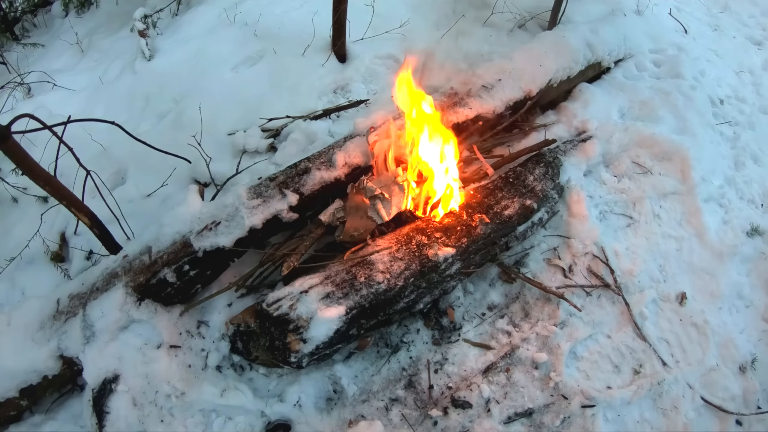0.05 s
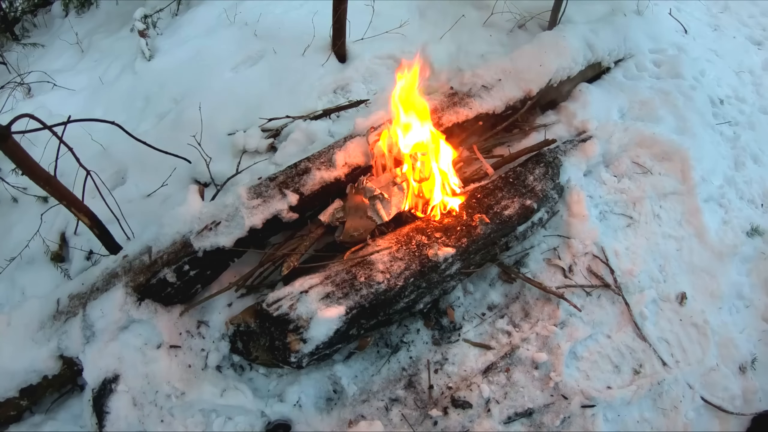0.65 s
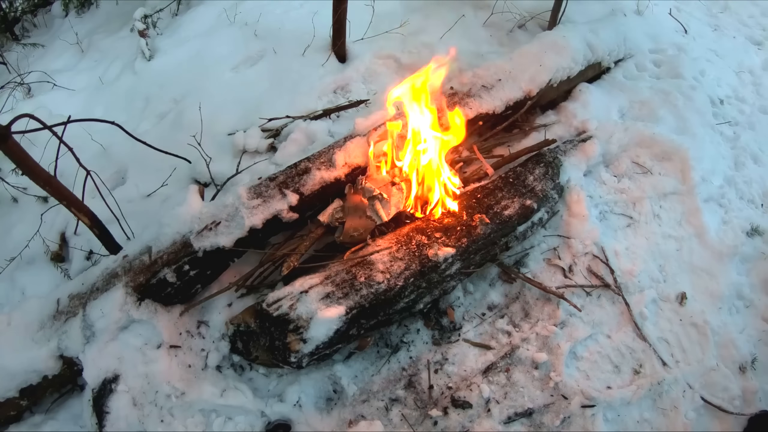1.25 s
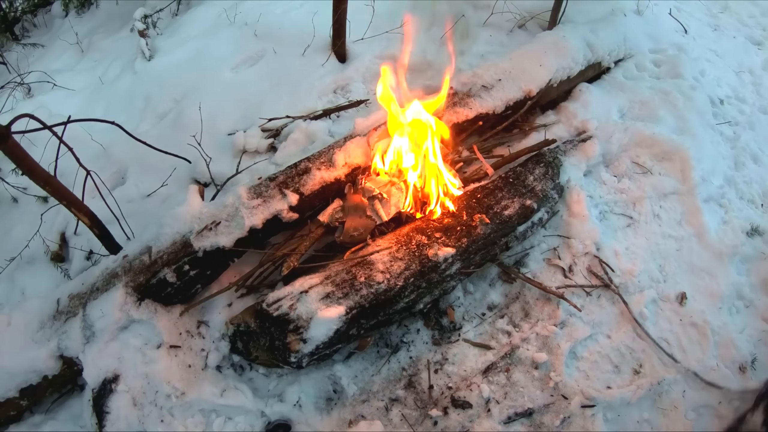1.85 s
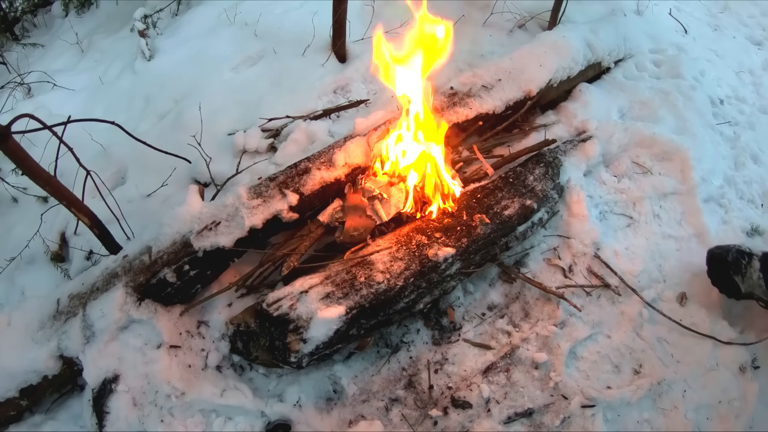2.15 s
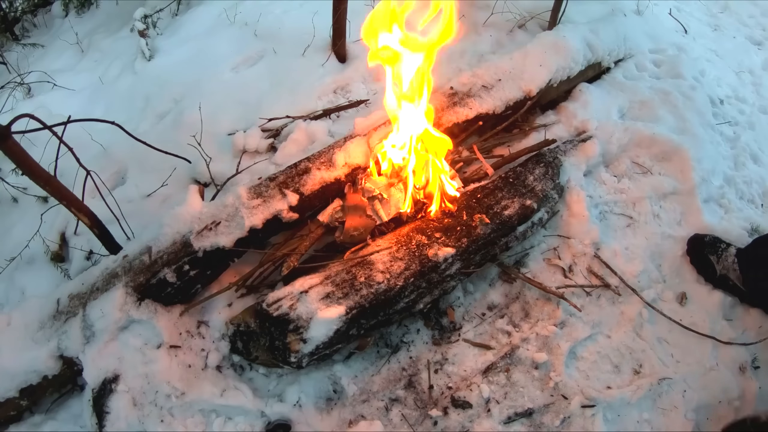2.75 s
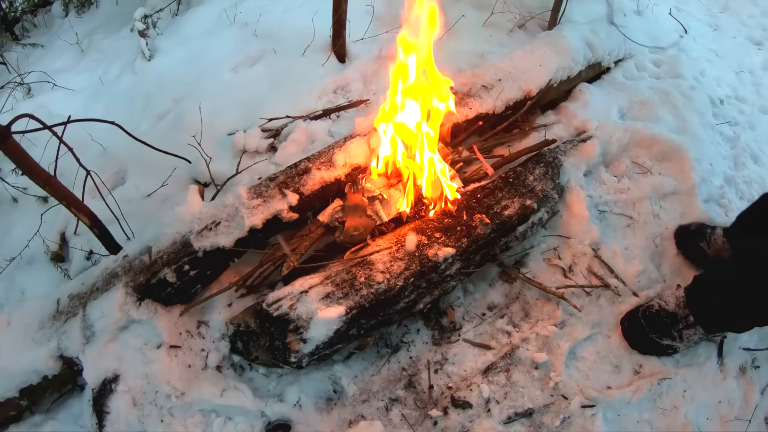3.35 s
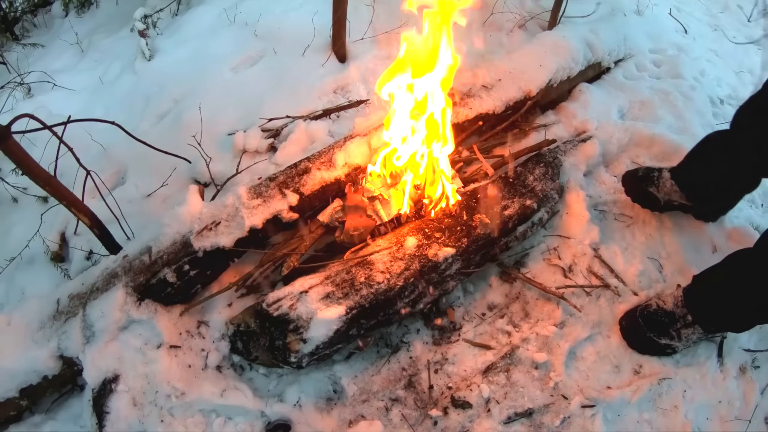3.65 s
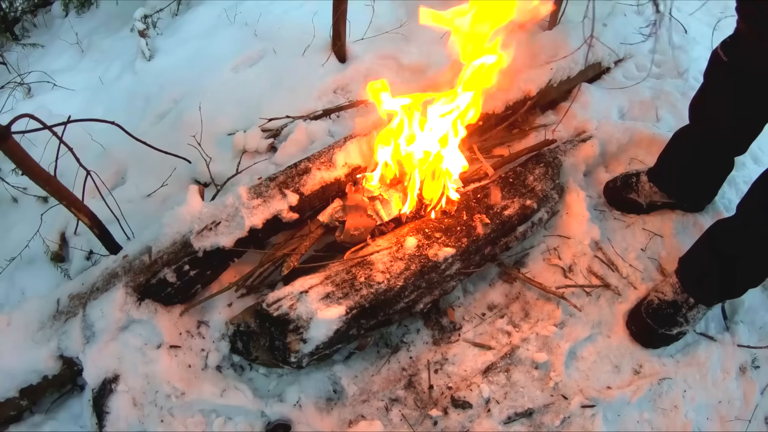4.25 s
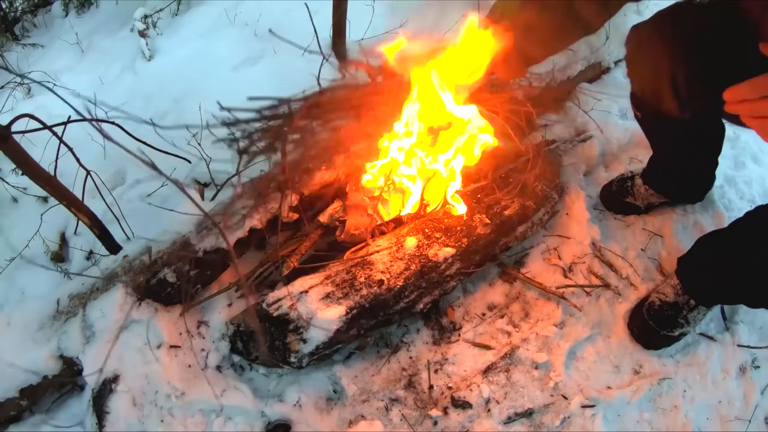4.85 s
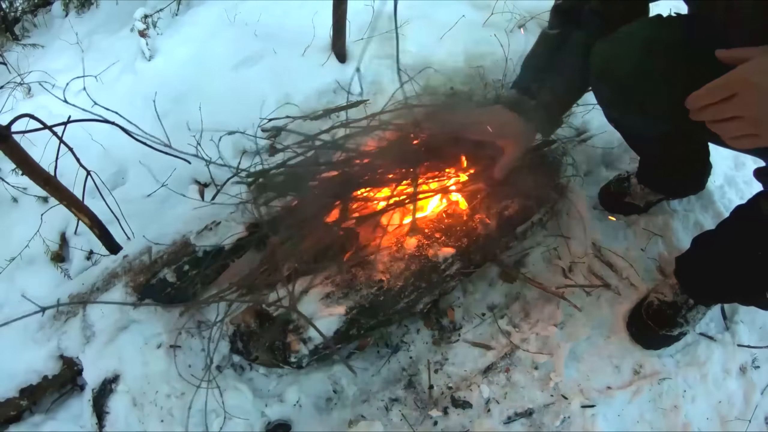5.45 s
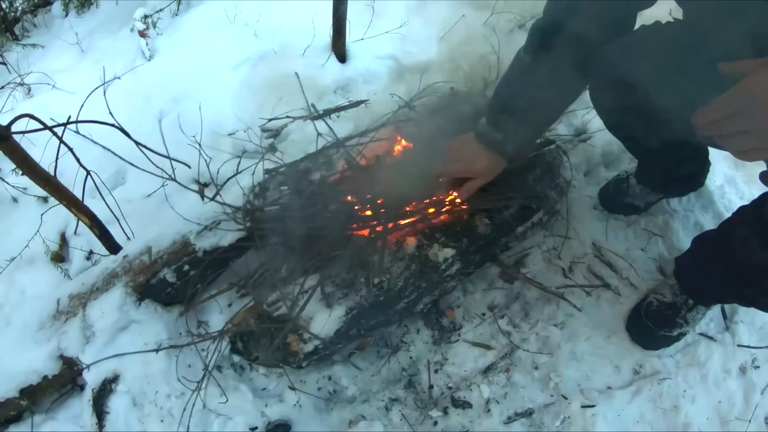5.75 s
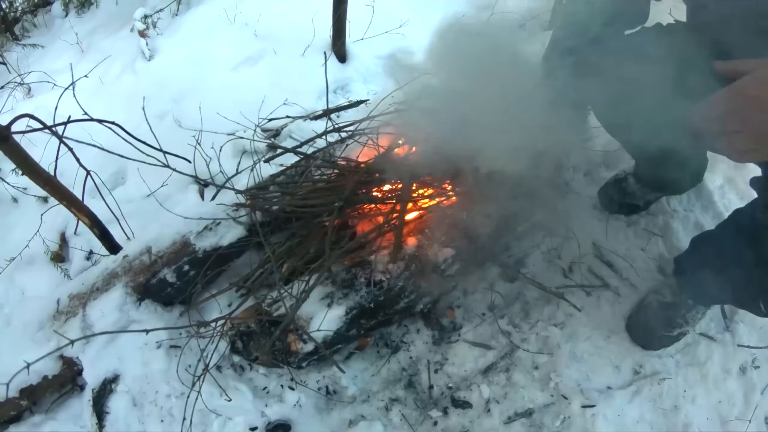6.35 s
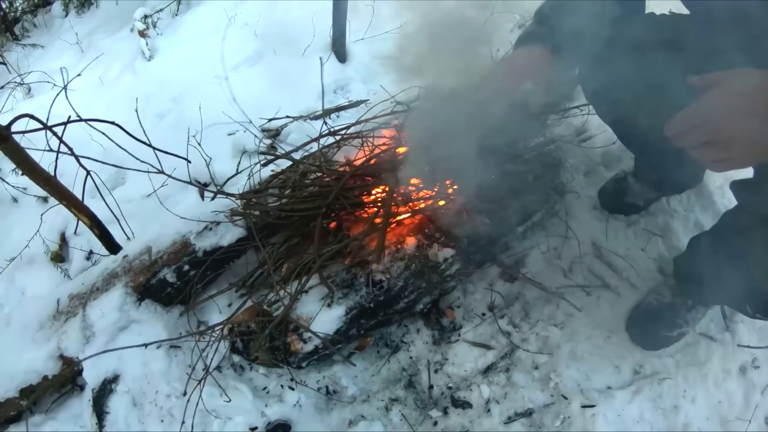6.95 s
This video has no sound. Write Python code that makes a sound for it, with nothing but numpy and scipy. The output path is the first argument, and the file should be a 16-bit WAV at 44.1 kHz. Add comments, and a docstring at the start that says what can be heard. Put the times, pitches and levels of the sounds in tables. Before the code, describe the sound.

A small campfire of damp wood hisses and pops close to the microphone in a snowy forest, with a low flutter of flames underneath. Footsteps crunch through the snow on the right, and a branch cracks underfoot. Then an armful of brushwood is pressed onto the fire, knocking and rustling, and a dry stick snaps. The fire ends quieter, half smothered. There is almost no echo.

```python
"""A small campfire of damp bark and kindling burns in a snowy forest, close to a stereo microphone:
steam hisses from the wood, pockets burst in pops and the flames flutter low. From about 1 s someone
crunches through the snow on the right, cracking a branch underfoot at 2.2 s. From about 4 s they press
an armful of brushwood onto the flames; it knocks and rustles, and a dry stick snaps at 5.7 s.
The fire ends half smothered."""
import sys
import numpy as np
from scipy import signal
from scipy.fft import rfft, irfft
from scipy.io import wavfile
from scipy.ndimage import uniform_filter1d

SR = 44100
rng = np.random.default_rng(int(sys.argv[2]) if len(sys.argv) > 2 else 0)


def transcribe(u):
    """Save the signal u as a 16-bit wav file named by the first command-line argument.

    u: samples, shape (n,) or (channels, n), limited to [-1, 1]; the rate is SR.
    q: integer samples, one column per channel.
    """
    v = np.clip(np.atleast_2d(u).T, -1, 1)
    q = np.round(v * 32767).astype(np.int16)
    wavfile.write(sys.argv[1], SR, q)


N = 317520

# the louder pops of fire and twigs: (time [s], relative level [dB], centre [Hz], left over right [dB])
POPS = [(0.1861,-33,3700,-1), (0.3154,-30.5,3700,-2), (0.4111,-28.5,4530,-1), (0.4866,-34,3490,-1),
        (.571,-37,3400,3), (.661,-29,3500,-1), (0.6835,-24,4220,0.5), (0.806,-28,4790,-20),
        (0.869,-32,5140,-11), (0.9587,-31,4230,0), (1.0577,-36.5,1980,-8), (1.181,-34,4520,13),
        (1.2059,-27,3800,-1), (1.3178,-28,3700,-1), (1.3464,-24.5,4400,1), (1.379,-33,4670,-17),
        (1.751,-31,4160,-1), (1.873,-28.5,3480,-1), (1.961,-25.5,3920,0.5), (2.0228,-18.5,3550,-0.5),
        (2.0685,-27.5,3950,-8), (2.1545,-21,5030,-10), (2.3188,-24.5,6000,0), (2.428,-27.5,3050,-25),
        (2.478,-24.5,1500,-29), (2.8763,-34,3310,-12), (2.984,-36,3500,-9), (3.068,-28.5,3350,-7),
        (3.303,-30.5,3820,-17), (3.626,-27,4400,-7), (3.8104,-31.5,3860,-10), (3.8478,-30.5,2820,-9),
        (3.8797,-26.5,4420,-4), (3.9352,-33,3040,-3), (4.0027,-28,4200,-2), (4.025,-28.5,2200,-17),
        (4.0733,-28,4370,4), (4.111,-32,4900,0), (4.1462,-34.5,4300,0), (4.3535,-34,2920,-1),
        (4.893,-40,4900,2), (4.919,-38,3800,0), (5.0047,-37,4060,0), (5.1058,-29,4230,3),
        (5.1706,-28,4630,6), (5.5187,-28,4300,-2), (5.576,-39.5,3320,0), (5.7802,-31.5,3660,-1),
        (5.903,-37,3500,-2), (5.936,-34,5500,1), (6.106,-36,3450,3), (6.289,-39,3900,0), (6.34,-44,1300,-4),
        (6.386,-46,5800,10), (6.965,-38,3140,0), (6.994,-36.5,3500,1)]
# steam from the wood, choked once the brushwood lies on it: (time [s], relative level [dB])
STEAM_CURVE = [(0,-40.5), (.2,-50.5), (.8,-43.5), (1.13,-45.5), (1.35,-38), (1.78,-43.5), (2.05,-40.5),
               (3.2,-38), (3.55,-35.5), (3.75,-40.5), (4.25,-38), (4.5,-40.5), (4.93,-40.5), (5.13,-40),
               (5.35,-46.5), (6.1,-43.5), (6.35,-54), (6.6,-55.5), (7.2,-46.5)]
# pockets of sap boil off: (time [s], half-width [s], lift of high jets [dB], lift of low jets [dB])
SAP_SURGES = [(0.032,0.015,-2,9.5), (0.112,0.028,4,10), (0.23,0.025,7,6), (0.343,0.093,7,13),
              (0.512,0.026,3,11), (0.717,0.097,4.5,9), (0.99,0.061,5.5,7), (2.14,0.077,8,8),
              (2.464,0.017,8,5), (2.64,0.016,5,6.5), (2.786,0.0082,10.5,5), (3.08,0.049,1.5,3.5),
              (3.82,0.018,3.5,6.5), (4.016,0.018,2,9)]
# steam puffs and twig scrapes: (time [s], level [dB], half-width [s], centre [Hz], left over right [dB])
SPURTS = [(.345,-40,0.033,3700,0), (.762,-21,0.0049,7450,-18), (1.348,-29,0.0045,4160,-3),
          (2.121,-39,.02,4150,-15), (2.154,-22.5,0.0027,4700,-4), (2.297,-30,0.003,3970,-3),
          (4.808,-27.5,0.0064,4770,3), (5.7,-24.5,0.0067,3860,-1), (5.904,-10,0.0014,5500,-0.5),
          (5.934,-24.5,0.012,6160,1), (6.769,-31,0.0065,4050,1)]
# sap sings in a narrow crack: (time [s], level [dB], half-width [s], pitch [Hz])
WHISTLES = [(0.05,-40,0.0066,2960), (0.361,-43,0.031,3220), (0.521,-36,0.007,6060), (0.53,-41,0.0073,3150),
            (0.609,-38.5,0.021,5760), (2.878,-33,0.006,3300)]
# tone of the fire's pops, bark ticks, steam jets and flames: (frequency [Hz], gain [dB])
SNAP_EQ = [(100, -29.5), (500, 1.5), (1000, 7.5), (2000, -3), (2900, 1.5), (4500, -6), (5900, 5.5),
           (7000, 1), (10000, -2.5)]
TICK_EQ = [(300, -28.5), (800, -6), (1500, -3.5), (2900, -10), (4600, -12.5), (5800, 7), (9000, -1.5)]
HIGH_JET_EQ = [(1000, -23), (3000, -21), (4500, -12), (5300, 0), (5800, -3.5), (6600, 3), (9000, -4)]
LOW_JET_EQ = [(300, -27.5), (800, -4), (1500, -6.5), (2300, -3.5), (2900, 2.5), (3700, -1), (4600, -4),
              (6000, -2), (9000, -19)]
FLAME_EQ = [(15,-13), (30,-13.5), (50,-4.5), (80,2), (130,0.5), (185,-8), (250,-17), (500,-46), (2000,-53)]
# the flames swell, then sink: (time [s], level [dB])
FLAME_CURVE = [(0,-44.5), (1,-42), (1.7,-38), (2.1,-40), (2.6,-42), (3.5,-38.5), (4.2,-46), (5,-48),
               (5.7,-51.5), (6.4,-54.5), (7.2,-60)]

# weight comes down on snow or brushwood, in relative levels:
# (time of full weight [s], build-up [s], crunch [dB], deep thud [dB], hollow groan [dB])
LOADS = [(1.09,0.015,-44,-35,-42), (1.38,0.17,-47,-34,-40.5), (1.921,0.035,-30,-31,-33.5),
         (2.25,0.18,-31,-30,-34), (2.50,0.2,-36.5,-30.5,-34.5), (2.72,0.4,-34,-34.5,-35.5),
         (2.90,1,-39,-60,-55), (3.409,0.063,-36,-26,-40), (3.64,0.26,-44,-39,-45),
         (4.10,0.26,-36.5,-43.5,-56), (4.28,0.0082,-35,-57.5,-60), (4.68,0.024,-43,-31,-42),
         (4.80,0.11,-42,-33.5,-49), (5.14,0.088,-40,-33.5,-34.5), (5.93,0.0098,-25.5,-28,-46),
         (6.069,0.028,-29.5,-32.5,-35.5), (6.78,0.19,-62,-49,-59)]
# faint settling of the embers, in relative levels: (crunch [dB], thud [dB], groan [dB])
EMBERS_DB = [-45, -46.5, -57.5]
# dull knocks of boots in packed snow and of shifted wood:
# (time [s], relative thud level [dB], pitch [Hz], thud decay [s], crunch level [dB], crunch decay [s])
KNOCKS = [(0.858,-32.5,280,.006,-51,0.004), (1.057,-33,202,0.0051,-35.5,0.0021),
          (1.073,-23,186,0.01,-33.5,0.006), (1.153,-30,177,0.0057,-35,0.0062),
          (1.241,-48,228,.006,-34.5,0.01), (1.292,-30.5,217,0.0065,-40,0.0014),
          (1.348,-26,191,0.0086,-36,0.0086), (1.377,-28,188,0.0086,-39,0.0033),
          (1.411,-27,220,0.0061,-36.5,.0023), (1.455,-34,252,.005,-29,0.0043),
          (1.467,-24,185,.006,-37,0.0021), (1.927,-40,195,0.0087,-28.5,0.0053),
          (2.24,-20.5,179,0.018,-35,0.0017), (2.318,-14.5,283,0.005,-21.5,0.003),
          (2.385,-28.5,294,0.0046,-49,0.0022), (2.428,-29,300,0.0076,-37,0.0035),
          (2.476,-28.5,340,0.0065,-29,0.013), (2.62,-34,298,.006,-28,0.0029),
          (2.686,-25.5,317,0.01,-33,.0042), (2.835,-24,322,0.0029,-39,0.0042),
          (2.756,-37,300,0.0055,-32,0.0028), (2.891,-36,282,0.0063,-27.5,0.019),
          (2.921,-31.5,286,0.0074,-32.5,0.0073), (3.327,-34,240,0.0045,-35,.003),
          (3.363,-36,220,0.0046,-31.5,0.0069), (3.38,-21.5,203,0.0053,-30.5,0.011),
          (3.418,-23,181,.006,-31.5,0.006), (3.429,-21,194,0.0067,-35,.005),
          (3.643,-21.5,245,0.0054,-24,0.0045), (4.095,-36,280,0.0082,-28.5,0.016),
          (4.416,-36,362,0.004,-52,0.0052), (4.465,-35,370,.005,-39,0.0026),
          (4.648,-29.5,330,0.0044,-39,0.0044), (4.688,-25,295,0.004,-36.5,0.0048),
          (4.775,-31,383,0.007,-32,0.017), (4.85,-32,271,0.0074,-30,0.014),
          (4.973,-35.5,222,.006,-39.5,.005), (5.062,-31,297,0.0053,-34.5,0.0045),
          (5.096,-24,235,0.005,-34,0.003), (5.134,-22,320,0.006,-26,0.0063),
          (5.147,-25,333,0.0054,-31.5,0.0056), (5.167,-28,200,0.0069,-33,0.0094),
          (5.193,-21.5,210,0.0032,-28,0.0036), (5.914,-31.5,403,0.0075,-31,.004),
          (5.93,-29.5,209,0.0095,-41,0.0044), (6.035,-25,370,0.0046,-29,0.0061),
          (6.063,-32,249,0.0045,-32,0.0029), (6.105,-34,251,0.0022,-48,0.0027)]
# a branch cracks under a boot: (time [s], level [dB], left over right [dB])
BRANCH_CRACKS = [(2.2419,-12,-16), (2.3201,-18,-16)]
# sticks knock together, underfoot or in the armful: (time [s], level [dB], pitch [Hz], rasp decay [s])
CLACKS = [(2.3205,-33,570,.002), (4.092,-30,627,0.0053), (4.4182,-24.5,614,0.00088),
          (4.4641,-24,614,0.0015), (4.510,-27,780,0.01), (4.777,-20,674,0.0037), (4.853,-27,880,0.0046),
          (5.137,-26.5,550,.0006), (5.1955,-23.5,846,0.00086), (5.842,-27.5,520,0.0034),
          (7.016,-38.5,900,.002)]
# dry twigs brush past each other with each push: (time [s], half-width [s], level [dB])
RUSTLES = [(4.801,0.038,-30.5), (5.082,0.051,-34), (5.49,0.032,-39.5), (5.7,0.039,-33.5), (5.805,0.025,-36),
           (5.946,0.031,-31), (6.122,0.076,-43), (6.327,0.087,-47), (6.525,0.044,-44), (6.735,0.077,-37.5),
           (6.93,0.039,-40), (7.086,0.063,-41.5)]
# a dry stick breaks: (time [s], level [dB])
STICK_BREAK = (5.7075, -15)
# the ring of its halves: (frequency [Hz], relative level [dB], decay [s])
STICK_MODES = [(1980, 3, 0.0025), (2200, 12.5, 0.0014), (2480, 10, 0.002), (2730, 3, 0.0053),
               (3200, -4, .001), (3550, 1.5, 0.0035)]
# tone of crunch, ground thud, snow-muffled grit, branch and twigs: (frequency [Hz], gain [dB])
CRUNCH_EQ = [(150, -40.5), (350, -19), (700, 0), (1200, 3.5), (1800, 2), (3000, -2), (6000, -10),
             (9000, -36.5)]
THUD_EQ = [(25, -41), (60, -18), (130, -3.5), (185, -1.5), (240, 0.5), (310, -13), (420, -9.5), (700, -16),
           (2000, -71)]
MUFFLED_EQ = [(120, -22), (350, -2), (550, 5.5), (1100, -2), (1700, -4.5), (2600, -5), (6000, -4)]
BRANCH_EQ = [(200,-16), (650,-6), (1030,3.5), (1350,-8), (1700,0.5), (2200,-4), (2800,-2.5), (3700,-17),
             (5000,-19), (6000,-14), (7000,-13.5), (9500,-13)]
RUSTLE_EQ = [(300,-3.5), (520,-8.5), (760,-0.5), (1050,-8.5), (1700,-6.5), (2300,-5), (3400,-1.5),
             (4600,-7), (6200,-4.5), (9000,-15.5)]
# treble loss of the microphone: (frequency [Hz], gain [dB])
MICROPHONE_EQ = [(20, -1.5), (6600, 1), (7100, -4), (7800, -13.5), (9200, -15.5), (9900, -29), (10500, -53),
                 (15000, -59)]


def pop(db, hz, pan_db, ring_db=-9):
    """Fibres tear and a pocket bursts; each splinter rings very briefly at its own pitch."""
    stretch = 1.5 + .05 * max(db + 26, 0)  # big pops tear for longer
    lead, burst = tearing(.0005 * stretch, .0007 * stretch, alike=0.93)
    ring_hz = hz * 0.9 * np.exp(0.17 * rng.standard_normal())
    ring = unit_rms(resonance(burst, ring_hz, q=9))
    body = unit_rms(resonance(burst, hz, q=1.13))
    snap = eq(body + gain_of(ring_db) * ring, SNAP_EQ)
    return lead, with_energy(snap, db + 1, held_s=.006) * pan(pan_db)


def small_pops(count=8):
    """Faint pops at random moments, louder where the steam runs stronger."""
    out, steam_db = np.zeros((2, N)), follow(STEAM_CURVE)
    moments = rng.integers(0, N, count)
    for at, (size, pitch, side) in zip(moments, rng.standard_normal((count, 3))):
        lead, sound = pop(steam_db[at] + 2 + 3.5 * size, hz=3900 * np.exp(.2 * pitch), pan_db=5 * side)
        add(out, at / SR + lead, sound)
    return out


def steam(high_db=-2, low_db=-3, tick_db=-8):
    """High and low jets and ticking bark ride one wavering pressure, surging as sap boils off."""
    pressure_db = follow(STEAM_CURVE) + 0.96 * wander(9)
    surge_db = sum(np.outer(lift_db, swell(s, width)) for s, width, *lift_db in SAP_SURGES)
    high_flow, low_flow = gain_of(pressure_db + surge_db)
    high = gain_of(high_db) * jet(HIGH_JET_EQ, whistle_hz=5880, whistle_db=-6, fuzz_hz=200)
    low = gain_of(low_db) * jet(LOW_JET_EQ, whistle_hz=3250, whistle_db=-16.5, fuzz_hz=180)
    ticks = gain_of(tick_db) * bark_ticks()
    return high_flow * (high + ticks) + low_flow * low


def jet(tone, whistle_hz, whistle_db, fuzz_hz, sputter_db=2.4, alike=0.35):
    """Steam sputters through a crack, whose fuzzy whistle flickers and drifts in pitch."""
    flow = patchy(stereo_noise(N, alike), depth_db=0.9) * gain_of(sputter_db * wander(60))
    flicker = gain_of(5 * np.tanh(wander(16)))
    note = fuzzy_note(whistle_hz * np.exp(.03 * wander(8)), fuzz_hz, alike)
    return unit_rms(eq(flow, tone)) + gain_of(whistle_db) * unit_rms(note * flicker)


def bark_ticks():
    """A bed of tiny ticks as the bark dries and splits."""
    t = np.arange(200) / SR
    splinter = rng.standard_normal(len(t)) * np.exp(-t / 0.00046)
    splinter = irfft(np.exp(1j * np.angle(rfft(splinter))))  # smears each tick and keeps it white
    splits = fractures(per_s=140, spread_db=1.5, scatter_db=10)
    ticks = signal.oaconvolve(splits, splinter[None])[:, :N]
    return unit_rms(eq(ticks, TICK_EQ))


def spurt(db, width, hz, pan_db, ragged_db=3):
    """A spurt of steam or a twig scrape: a ragged puff of hiss that swells and dies."""
    t = np.arange(-4096, 4096) / SR
    noise = stereo_noise(len(t), alike=0.64) * gain_of(ragged_db * wander(300, size=len(t)))
    noise = roll_off(noise, "highpass", hz=1500, order=2)
    hiss = eq(resonance(noise, hz, q=2.7), SNAP_EQ)
    bell = np.exp(-(t / width) ** 2 / 2)
    puff = unit_rms(hiss * bell) * np.sqrt(np.mean(bell ** 2))
    return t[0], gain_of(db) * puff * pan(pan_db)


def whistle(db, width, hz, sag_per_s=0.43):
    """A fuzzy note of steam swells and dies, sinking in pitch as the pocket empties."""
    t = np.arange(-4096, 4096) / SR
    note = fuzzy_note(hz * np.exp(-sag_per_s * t), fuzz_hz=170, alike=0.34)
    return t[0], gain_of(db) * note * np.exp(-(t / width) ** 2 / 2)


def crush(clump_db=2, grain_share=0.29, groan_hz=305, groan_q=2.52):
    """Snow and twigs give way in clumps that crunch, thud through the ground and groan hollowly."""
    clumps = gain_of(clump_db * wander(50))
    grains = np.sqrt(grain_share) * fractures(per_s=900, spread_db=1, scatter_db=4.5)
    hiss = np.sqrt(1 - grain_share) * stereo_noise(N, alike=0.23)
    drive = clumps * (grains + hiss)
    crunch = gain_of(-3) * unit_rms(eq(patchy(drive, depth_db=2), CRUNCH_EQ)) * pan(-8)
    thud = unit_rms(from_the_right(eq(drive, THUD_EQ)))
    hollow = resonance(resonance(drive, groan_hz, groan_q), groan_hz, groan_q)
    groan = unit_rms(from_the_right(hollow))
    crunch_gain, thud_gain, groan_gain = weight()
    return crunch_gain * crunch + thud_gain * thud + groan_gain * groan


def weight():
    """Crunch, thud and groan envelopes: each load builds and eases off, over the settling embers."""
    t, steam_db = np.arange(N) / SR, follow(STEAM_CURVE)
    settling_db = np.array(EMBERS_DB)[:, None] + 0.7 * (steam_db - steam_db.mean())
    power = gain_of(settling_db) ** 2
    for s, build_s, *layer_db in LOADS:
        release_s = 0.025 + 0.31 * build_s
        press = np.exp(np.minimum((t - s) / build_s, (s - t) / release_s))
        power += np.outer(gain_of(layer_db), press) ** 2
    return np.sqrt(power)


def knock(thud_db, hz, ring_s, crunch_db, crumble_s, lag_rad=1.0, pan_db=-7):
    """A low, damped swing of ground or log under a short, gritty crunch."""
    t = np.arange(4096) / SR
    phase = 2 * np.pi * hz * t + np.array([[0], [lag_rad]])  # the right side is nearer
    thud = np.sin(phase) * (1 - np.exp(-t / 0.0015)) * np.exp(-t / ring_s)
    spikes = stereo(rng.standard_normal((3, len(t))) ** 3, alike=0.36)
    grit = spikes * (1 - np.exp(-t / 0.00054)) * np.exp(-t / crumble_s)
    grit = resonance(eq(flattened(grit), MUFFLED_EQ), hz=718, q=0.73) * (t < .07)
    grit /= np.sqrt(np.mean(grit[:, t < .01] ** 2))  # the attack sets the level
    return gain_of(thud_db + 10) * thud + gain_of(crunch_db) * grit * pan(pan_db)


def branch_crack(db, pan_db):
    """Thick wood splits: a broad, dry crack with hardly any ring."""
    lead, burst = tearing(rise_s=.001, fall_s=.0013, alike=.8)
    return lead, with_energy(eq(burst, BRANCH_EQ), db, held_s=.006) * pan(pan_db)


def stick_snap(db):
    """Fibres give way one after another and set the stick's halves ringing briefly."""
    lead, burst = tearing(rise_s=0.0023, fall_s=0.0032, alike=0.89)
    age = np.arange(burst.shape[1]) / SR
    ring = sum(gain_of(mode_db) * np.exp(-age / decay) * np.cos(2 * np.pi * hz * age)
               for hz, mode_db, decay in STICK_MODES)
    snap = signal.oaconvolve(burst, ring[None], axes=1)
    snap = roll_off(snap, "highpass", hz=1500, order=4)
    snap = roll_off(snap, "lowpass", hz=7000, order=1)
    return lead, with_energy(snap, db, held_s=.01)


def clack(db, hz, rasp_s, ring_s=.0024):
    """Sticks scrape and catch: a short rasp around one blow excites two damped bending modes."""
    t = np.arange(-512, 1536) / SR
    age = t - t[0]
    blow = t == 0
    rasp = .12 * rng.standard_normal(len(t)) * np.exp(np.minimum(2 * t / rasp_s, -t / rasp_s))
    low_mode = np.exp(-age / ring_s) * np.sin(2 * np.pi * hz * age)
    high_mode = np.exp(-2 * age / ring_s) * np.sin(2 * np.pi * hz * 1.95 * age)
    note = signal.oaconvolve(blow + rasp, low_mode + gain_of(-5) * high_mode)
    note = from_the_right(roll_off(note, "lowpass", hz=1800, order=1), lag_rad=0.27)
    return t[0], with_energy(note, db, held_s=.003) * pan(-6)


def brushwood(ragged_db=2):
    """Many twig tips scrape at once, in a ragged swell with each push."""
    push = np.sqrt(sum((gain_of(db) * swell(s, width)) ** 2 for s, width, db in RUSTLES))
    scrape = patchy(stereo_noise(N, alike=0.45), depth_db=2) * gain_of(ragged_db * wander(120))
    return push * unit_rms(eq(scrape, RUSTLE_EQ)) * pan(1)


def flames():
    """A low flutter of moving air, partly out of phase between left and right."""
    air = stereo_noise(N, alike=0.48) * np.array([[1], [-1]])
    return gain_of(follow(FLAME_CURVE)) * unit_rms(eq(air, FLAME_EQ)) * pan(-1.1)


def forest(x, wet_db=-17, t60_s=0.091, echoes_per_s=3000):
    """Adds weak, short scatter from logs and trunks; the snow swallows the rest."""
    t = np.arange(SR // 3) / SR
    echoes = rng.standard_normal((2, len(t))) * (rng.random((2, len(t))) < echoes_per_s / SR)
    tail = echoes * (t > .003) * gain_of(-60 * t / t60_s)
    tail /= np.linalg.norm(tail, axis=1, keepdims=True)
    return x + gain_of(wet_db) * signal.oaconvolve(x, tail, axes=1)[:, :N]


def tearing(rise_s, fall_s, alike):
    """A white burst of parting fibres; returns its start relative to the peak [s] and the sound."""
    t = np.arange(-512, 1536) / SR
    envelope = np.exp(np.minimum(t / rise_s, -t / fall_s))
    return t[0], flattened(stereo_noise(len(t), alike) * envelope)


def fractures(per_s, spread_db, scatter_db):
    """Random tiny clicks, mostly small, each from its own direction."""
    at = np.flatnonzero(rng.random(N) < per_s / SR)
    size = gain_of(spread_db * np.minimum(rng.exponential(1, N), 4)) * rng.choice([-1, 1], N)
    side_db = scatter_db * rng.standard_normal(N)
    out = np.zeros((2, N))
    out[:, at] = size[at] * gain_of([side_db[at] / 2, -side_db[at] / 2])
    return unit_rms(out)


def patchy(x, depth_db):
    """Single cracks open and close, each lifting its own band for a moment."""
    bands = signal.stft(x, nperseg=512, noverlap=384)[2]
    patches = uniform_filter1d(rng.standard_normal(bands.shape[1:]), size=5, axis=0)  # across pitch
    patches = unit_rms(uniform_filter1d(patches, size=12, axis=1))  # across time
    return signal.istft(bands * gain_of(depth_db * patches), nperseg=512, noverlap=384)[1][:, :N]


def fuzzy_note(hz, fuzz_hz, alike):
    """A narrow stereo band of noise that follows a pitch curve."""
    phase = 2 * np.pi * np.cumsum(hz) / SR
    notes = [wander(fuzz_hz, len(hz)) * np.cos(phase) + wander(fuzz_hz, len(hz)) * np.sin(phase)
             for _ in range(3)]
    return stereo(np.array(notes), alike)


def wander(rate_hz, size=N):
    """Smooth random motion of rms 1, mostly slower than the given rate."""
    f = np.fft.rfftfreq(size, 1 / SR)
    return unit_rms(irfft(rfft(rng.standard_normal(size)) / (1 + (f / rate_hz) ** 2), size))


def swell(s, width):
    """A bell-shaped rise and fall around time s."""
    return np.exp(-((np.arange(N) / SR - s) / width) ** 2 / 2)


def follow(curve):
    """A level curve at every sample."""
    return np.interp(np.arange(N) / SR, *np.transpose(curve))


def eq(x, points):
    """Filters by a curve drawn on a log-frequency axis."""
    hz, db = np.transpose(points)
    f = np.fft.rfftfreq(x.shape[-1], 1 / SR)
    curve_db = np.interp(np.log(f + 1), np.log(hz), db)
    return irfft(rfft(x) * gain_of(curve_db), x.shape[-1])


def resonance(x, hz, q):
    """One damped resonance."""
    return signal.lfilter(*signal.iirpeak(min(hz, SR / 4), q, fs=SR), x)


def roll_off(x, kind, hz, order):
    """Trims the lows or the highs."""
    return signal.sosfilt(signal.butter(order, hz, kind, fs=SR, output="sos"), x)


def flattened(burst):
    """Halves the spectral peaks and dips in dB, so a burst excites all pitches more evenly."""
    spectrum = rfft(burst)
    return irfft(spectrum / np.sqrt(abs(spectrum) + 1e-9))


def stereo(three, alike):
    """Two channels from one shared signal, with power share `alike`, and one private signal each."""
    return np.sqrt(alike) * three[0] + np.sqrt(1 - alike) * three[1:]


def stereo_noise(size, alike):
    """White noise, partly shared by left and right."""
    return stereo(rng.standard_normal((3, size)), alike)


def from_the_right(x, lag_rad=0.35):
    """Low sound reaches the left channel slightly later in phase."""
    return (signal.hilbert(x) * np.exp(1j * np.array([[-lag_rad], [0]]))).real


def pan(pan_db):
    """Left and right gains of mean power 1; positive leans left."""
    return unit_rms(gain_of([[pan_db / 2], [-pan_db / 2]]))


def gain_of(db):
    """Decibels to amplitude."""
    return 10 ** (np.asarray(db) / 20)


def unit_rms(x):
    """Scales to rms 1."""
    return x / np.sqrt(np.mean(x ** 2) + 1e-20)


def with_energy(sound, db, held_s):
    """Gives a short sound the energy of this level held for this time."""
    return gain_of(db) * sound / np.sqrt((sound ** 2).mean(0).sum() / (held_s * SR))


def add(mix, s, sound):
    """Mixes a sound in, starting at time s."""
    start = round(s * SR)
    sound = sound[:, max(-start, 0):]
    part = mix[:, max(start, 0):][:, :sound.shape[1]]
    part += sound[:, :part.shape[1]]


def scene():
    """One-shots with a touch of forest, over beds of steam, crushed snow, brushwood and flames."""
    hits = small_pops()
    cues = ((pop, POPS), (spurt, SPURTS), (whistle, WHISTLES), (clack, CLACKS),
            (branch_crack, BRANCH_CRACKS), (stick_snap, [STICK_BREAK]))
    for source, table in cues:
        for s, *row in table:
            lead, sound = source(*row)
            add(hits, s + lead, sound)  # starts early so the peak lands on the cue
    for s, *row in KNOCKS:
        add(hits, s, knock(*row))
    return forest(hits) + steam() + crush() + brushwood() + flames()


def record(dry, knee=12, cutoff_hz=15700):
    """A microphone with dull treble, soft overload on the loudest snaps, and a band limit."""
    dulled = eq(dry, MICROPHONE_EQ)
    limited = dulled / (1 + abs(dulled) ** knee) ** (1 / knee)
    lowpass = signal.firwin(511, cutoff_hz, window=("kaiser", 9), fs=SR)
    return signal.oaconvolve(limited, lowpass[None], "same")


dry = scene()
out = record(dry)
transcribe(out)
```